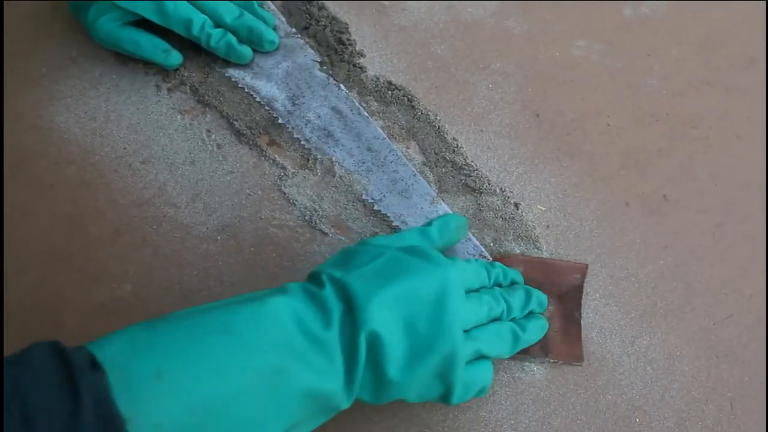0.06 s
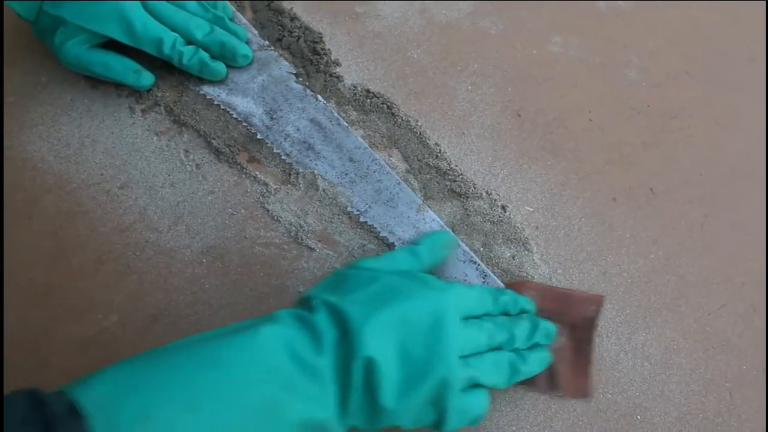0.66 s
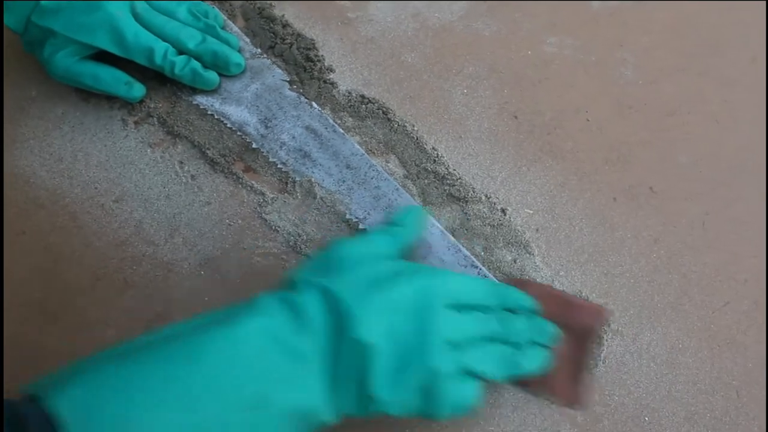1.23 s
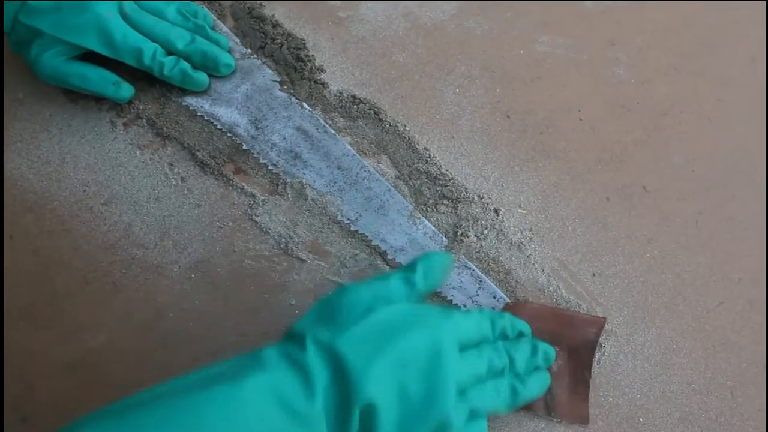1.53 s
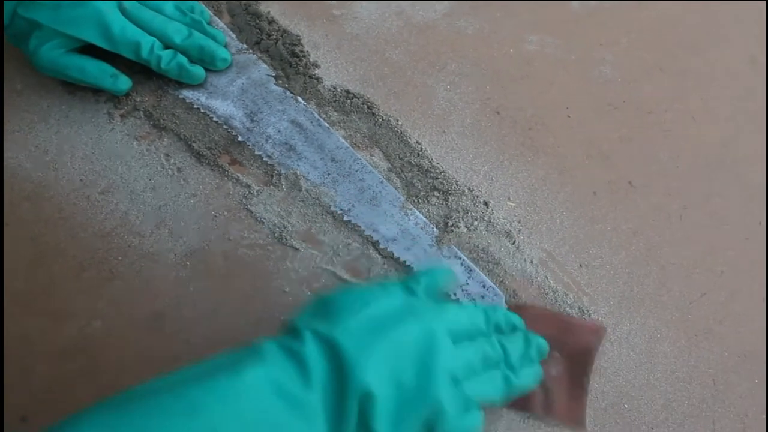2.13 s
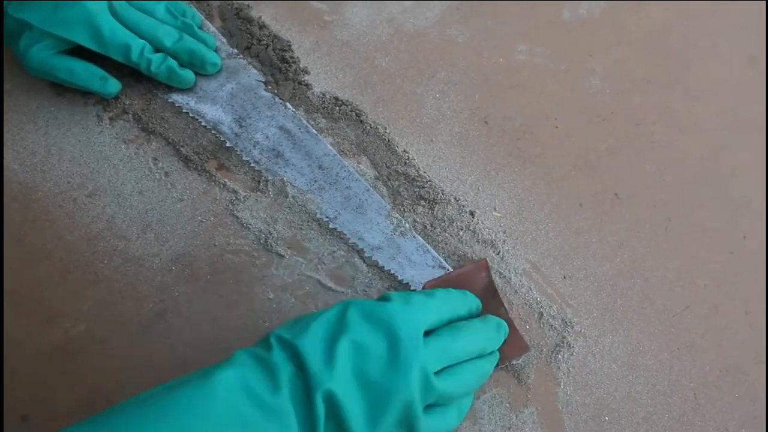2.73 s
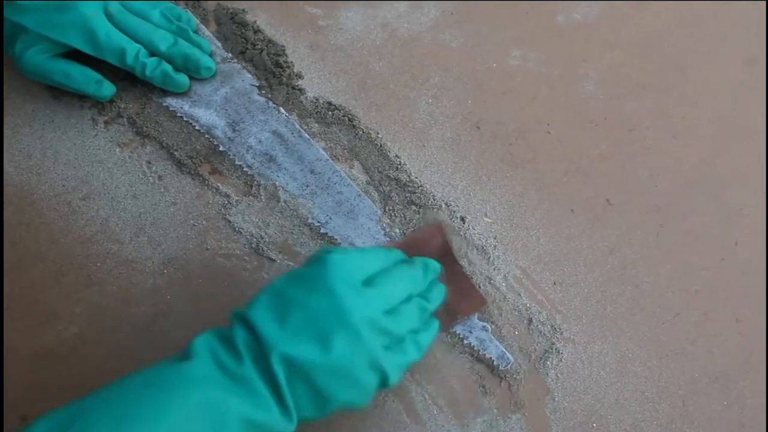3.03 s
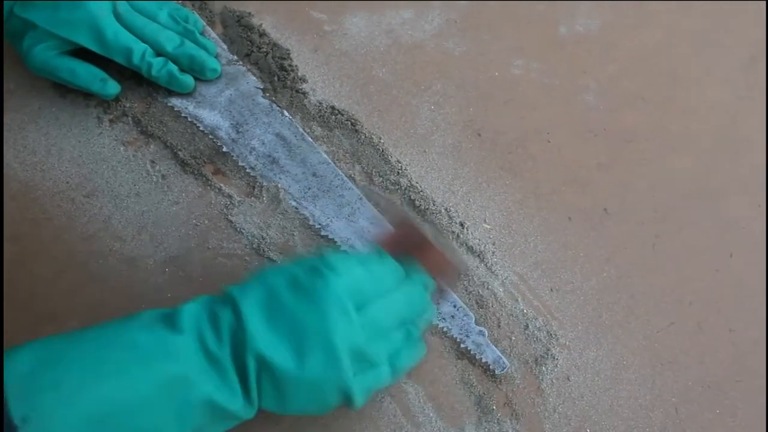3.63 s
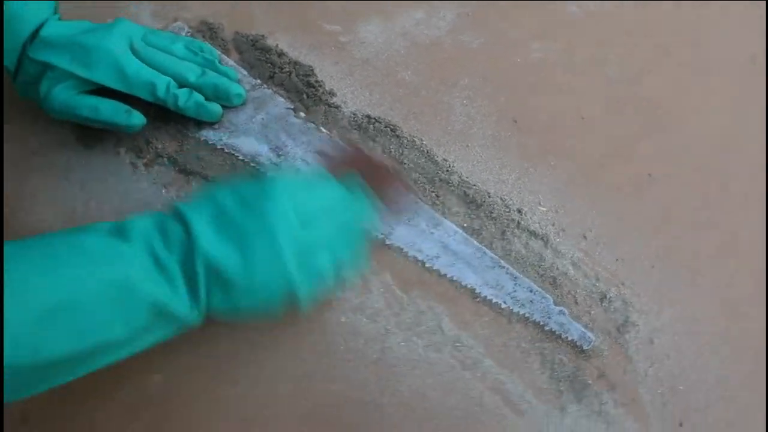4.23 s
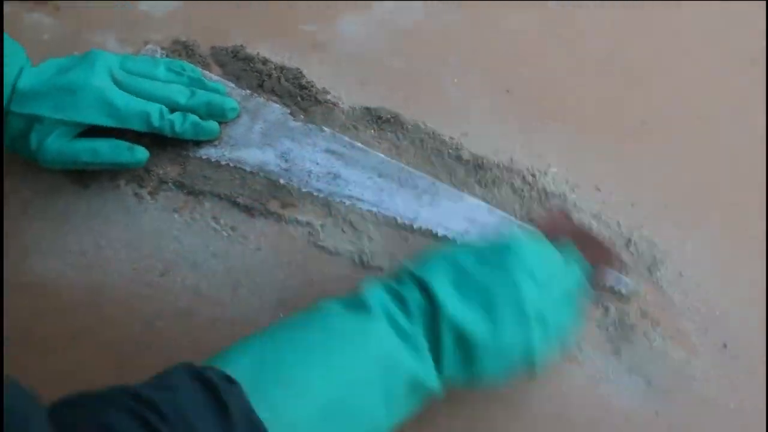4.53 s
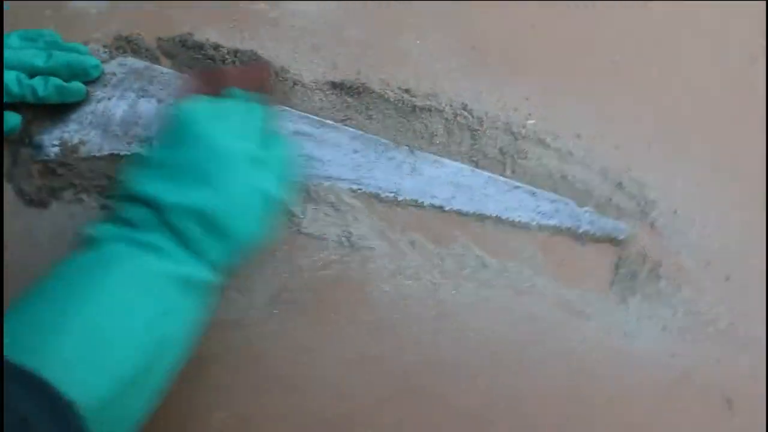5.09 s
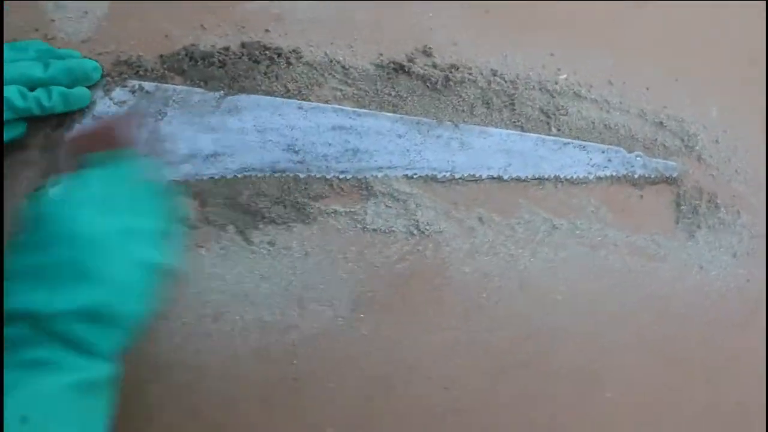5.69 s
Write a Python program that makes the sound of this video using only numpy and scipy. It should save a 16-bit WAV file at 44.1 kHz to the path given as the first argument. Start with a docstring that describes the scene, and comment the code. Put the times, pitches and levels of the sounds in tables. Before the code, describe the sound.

Quick, gritty strokes of sandpaper and sand rasp on a rusty saw blade, almost stopping midway, then scrubbing harder.

```python
"""A gloved hand scrubs sandpaper and sand over a rusty saw blade on a concrete floor; the strokes follow each
other very fast. It starts softly with a flat hand, grows louder on the blade's tip and almost stops just before
3 s. It goes on with the fingertips, hard at mid blade, lighter on the pad's edge, then hard on the heel. All
along, crushed grit rasps, the blade hums dully, the glove rumbles and sometimes bumps, and the workshop gives a
short echo."""
import sys
import numpy as np
from scipy import signal
from scipy.fft import rfft, irfft
from scipy.io import wavfile
from scipy.ndimage import uniform_filter1d, map_coordinates

SR = 44100
rng = np.random.default_rng(int(sys.argv[2]) if len(sys.argv) > 2 else 0)


def pcm_store(signal):
    """Save signal as 16-bit PCM."""
    levels = np.round(np.clip(np.atleast_2d(signal), -1, 1) * 32767)
    wavfile.write(sys.argv[1], SR, levels.astype(np.int16).T)


N = 262395
TIME = np.arange(N) / SR

# Tone of the rasp for each way of holding the pad: pitch_hz, level_db
FLAT_HAND = [(600, -2), (1000, -5), (1150, -5.5), (1800, -5.5), (2400, -0.2), (3000, 1), (3800, -4),
             (5400, -2), (8700, -12), (10000, -13), (11000, -16), (14000, -20), (15500, -27)]
ON_TIP = [(600, -11.5), (1000, -10.5), (1150, -7), (2350, -9.5), (2850, 1), (3500, -2.5), (4300, -7),
          (6200, -7.5), (8000, -7.5), (10600, -4.5), (14200, -11.5), (15500, -19)]
FINGERTIPS = [(600, -12.5), (1000, -11), (1250, -4.5), (1600, -1), (2150, -11), (2600, -5.5), (3100, -0.5),
              (4300, -2.5), (5800, -3.5), (7200, -7.5), (9500, 2.5), (14000, -3), (15500, -12)]
MID_BLADE = [(600, -6.5), (1000, -6.5), (1350, -3), (1900, -9), (2700, -2), (3900, 1.5), (4700, -0.7),
             (7500, -3), (9700, -4), (11500, -8.5), (14200, -12), (15500, -22)]
PAD_EDGE = [(600, -7), (1100, -4.5), (1600, 1.5), (2350, -7), (3100, -1.5), (3700, -2.5), (4400, -6),
            (6000, -4), (7200, -7), (10500, -3), (13500, -11), (15500, -16)]
ON_HEEL = [(600, -12.5), (1000, -13.5), (1650, -8.5), (2400, -14), (3200, -4.5), (3800, -3), (4400, -5.5),
           (7000, -6.5), (9200, -6), (11500, -9.5), (14300, -13), (15500, -25)]
# Each hold, with base levels against the rasp: start_s, end_s, tone, rumble_db, hum_db, fizz_db
HOLDS = [(0, 1.22, FLAT_HAND, -16.5, -16, -5.8), (1.504, 2.833, ON_TIP, -21.5, -12.5, -7.5),
         (3.02, 3.45, FINGERTIPS, -26, -17, -10), (3.8, 4.2, MID_BLADE, -22, -13.5, -6.5),
         (4.4, 4.51, MID_BLADE, -25.5, -30, -6), (4.614, 4.834, PAD_EDGE, -20.5, -14.5, -7),
         (5.003, 6.0, ON_HEEL, -25.5, -25, -6)]


def amp(db):
    """Turns decibels into a gain."""
    return 10 ** (np.asarray(db) / 20)


def unit(x):
    """Scales a signal to an average power of 1."""
    return x / np.sqrt(np.mean(x ** 2) + 1e-20)


def add(mix, start_s, sound):
    """Mixes a sound in at the given time."""
    part = mix[max(round(start_s * SR), 0):][:len(sound)]
    part += sound[:len(part)]


def colour(x, tone, low_hz=10):
    """Filters by (pitch_hz, level_db) points, cutting steeply below low_hz."""
    hz = np.fft.rfftfreq(len(x), 1 / SR) + 1
    pitch_hz, level_db = np.transpose(tone)
    gain = amp(np.interp(np.log(hz), np.log(pitch_hz), level_db)) / np.sqrt(1 + (low_hz / hz) ** 10)
    return irfft(rfft(x) * gain, len(x))


def wander(rate_hz):
    """A smooth random wobble, up to about the given rate."""
    hz = np.fft.rfftfreq(N, 1 / SR)
    return unit(irfft(rfft(rng.standard_normal(N)) * np.exp(-(hz / rate_hz) ** 2), N))


def grit(per_s, spread_db, bed):
    """Grains of uneven size snap over a hissing bed of countless fine ones."""
    size = amp(spread_db * np.minimum(rng.exponential(1, N), 4)) * rng.choice([-1, 1], N)
    snaps = unit(size * (rng.random(N) < per_s / SR))
    return unit(snaps + bed * rng.standard_normal(N))


def held(values):
    """Takes one value per hold and glides between them as the hand shifts."""
    return np.interp(TIME, np.ravel([hold[:2] for hold in HOLDS]), np.repeat(values, 2))


def still_air(level_db=-54.5):
    """The air of the workshop makes a faint, steady hush."""
    # Tone of the hush: pitch_hz, level_db
    air_tone = [(20, -14), (60, -10.5), (200, -5), (700, -3), (3000, -6), (7000, -15), (15000, -19)]
    return amp(level_db) * unit(colour(rng.standard_normal(N), air_tone))


def workshop_echo(sound, fade_s=0.18, level_db=-20, delay_s=0.0083):
    """The room answers with a short, slightly dull tail that falls 60 dB in fade_s."""
    t = TIME[:SR // 2]
    tail = colour(rng.standard_normal(len(t)), [(200, 9.0), (2000, 2.0), (14000, -2.5)])
    tail *= amp(-60 * t / fade_s) * (t > delay_s)
    return amp(level_db) * signal.oaconvolve(sound, tail / np.linalg.norm(tail))[:N]


def hand_bumps(swell_s=0.0065, gain_db=-6):
    """The hand knocks the blade: a soft, low thud with no ring."""
    # Knocks, before gain_db: start_s, level_db
    knocks = [(0.585, -47), (0.725, -39), (1.065, -35), (1.225, -36), (2.537, -43), (2.612, -42),
              (3.803, -38), (3.881, -40), (4.237, -39), (4.311, -42), (4.913, -39), (5.435, -33.5)]
    thud_tone = [(40, -25), (110, -6.5), (290, -4.0), (600, -17), (2000, -51)]  # pitch_hz, level_db
    out, t = np.zeros(N), TIME[:SR // 12]
    for start_s, level_db in knocks:
        thud = colour(rng.standard_normal(len(t)), thud_tone) * t * np.exp(-t / swell_s)
        add(out, start_s, amp(level_db + gain_db) * thud / abs(thud).max())
    return out


def grain_cracks(decay_s=0.0052):
    """Single coarse grains burst with a bright tick."""
    # Bursting grains: start_s, peak_db
    bursts = [(0.06, -26), (1.213, -35), (2.926, -28)]
    out, t = np.zeros(N), TIME[:SR // 50]
    for start_s, peak_db in bursts:
        tick = colour(rng.standard_normal(len(t)), ON_HEEL, low_hz=1500) * np.exp(-t / decay_s)
        add(out, start_s, amp(peak_db) * tick / abs(tick).max())
    return out


def glove_rumble(force, lumpy_db=1.2, gain_db=-1):
    """Rubber and paper judder over the sand, rumbling under each stroke."""
    # Tone of rubber dragging over the floor: pitch_hz, level_db
    rubber_tone = [(25, -29), (60, -18), (110, -9.5), (140, -9), (170, -5), (250, 1), (320, 4), (385, -1),
                   (470, -0.5), (620, -9.5), (900, -38)]
    drag = colour(grit(per_s=770, spread_db=2.5, bed=0.86), rubber_tone)
    judder = unit(drag * amp(lumpy_db * wander(rate_hz=30)))
    return amp(gain_db) * force * judder


def blade_hum(force):
    """Grit sets the blade ringing; the sand it lies on soon stops each note."""
    # The blade's own notes (wider ones die sooner): pitch_hz, width_hz, level_db
    notes = [(542, 29, -12.5), (659, 32, -6), (720.6, 38, 1), (776, 55, -2.5), (827, 62, -1), (937, 73, -8)]
    t = TIME[:SR // 10]
    ring = np.zeros(len(t))
    for k, (pitch_hz, width_hz, level_db) in enumerate(notes):
        fade = amp(level_db) * width_hz * np.exp(-np.pi * width_hz * t)
        ring += (-1) ** k * fade * np.cos(2 * np.pi * pitch_hz * t)
    dull_ring = colour(ring, [(1000, 4), (1600, -19), (5000, -42)], low_hz=394)[:SR // 20]
    taps = force * grit(per_s=2500, spread_db=2.0, bed=0.74)
    return signal.oaconvolve(taps, dull_ring / np.linalg.norm(dull_ring))[:N]


def hand_strokes(jitter_s=0.0007, uneven_db=0.5):
    """The hand scrubs to and fro. Gives one row per stroke: time_s, level_db, length_factor."""
    # Runs of evenly paced strokes, alternating by swing_db:
    # first_s, last_s, count, first_db, last_db, swing_db, length_factor
    runs = [(0.015, 0.262, 7, -40, -41.5, -0.2, 0.84), (0.3, 0.765, 12, -40, -39, 0.5, 0.93),
            (0.807, 1.229, 11, -39.5, -36, -0.3, 0.9), (1.277, 1.435, 5, -35.5, -35, 1.3, 0.99),
            (1.473, 1.643, 6, -28.5, -28.5, -1, 0.74), (1.678, 2.238, 18, -29.2, -26.5, 0, 0.75),
            (2.275, 2.355, 3, -33, -38.5, 0, 0.85), (2.429, 2.552, 4, -39.5, -32.5, 1, 1.03),
            (2.588, 2.749, 6, -35, -37.5, 1.5, 0.81), (2.808, 2.883, 3, -48, -56.5, 2, 2.1),
            (2.954, 2.996, 2, -38.5, -32, -2, 1.17), (3.03, 3.413, 12, -31, -30, 0, 0.95),
            (3.443, 3.779, 10, -30.2, -29, -0.5, 1.016), (3.813, 4.135, 10, -25.3, -23, 0.5, 0.91),
            (4.166, 4.515, 10, -23.5, -25, 0.04, 0.94), (4.552, 4.734, 6, -31.5, -33.5, -2, 1.01),
            (4.766, 4.963, 6, -31, -29, 2, 0.96), (4.998, 5.463, 13, -23.5, -23, 0, 1.04),
            (5.502, 5.702, 6, -23, -24, -0.5, 1.04), (5.741, 5.962, 7, -24, -26, -0.5, 0.96)]
    # Single strokes that dig in harder: time_s, extra_db
    accents = [(0.182, 3), (0.6, 4), (0.847, 3.5), (1.018, 2.5), (1.939, 4), (2.623, 5.5), (4.807, 5.2)]
    rows = []
    for first_s, last_s, count, first_db, last_db, swing_db, length in runs:
        for k, (time_s, db) in enumerate(np.linspace((first_s, first_db), (last_s, last_db), count)):
            late, harder = rng.standard_normal(2)
            level_db = db + swing_db * (-1) ** k + uneven_db * harder
            rows.append((time_s + jitter_s * late, level_db, length))
    strokes = np.array(rows)
    for time_s, extra_db in accents:
        nearest = np.argmin(abs(strokes[:, 0] - time_s))
        strokes[nearest, 1] += extra_db
    return strokes


def rubbing_force(strokes, rise_s=0.011, fall_s=0.018, lead_s=0.00094, gain_db=1.7):
    """Each stroke bites quickly and eases off, no two at quite the same pace."""
    power = np.zeros(N)
    for time_s, level_db, length in strokes:
        bite, ease = amp(1.2 * rng.standard_normal(2))  # random stretch of rise and fall
        near = abs(TIME - time_s) < 0.07
        from_peak = (TIME[near] - time_s + lead_s) / length
        rising = (from_peak / (rise_s * bite)) ** 2
        falling = abs(from_peak / (fall_s * ease)) ** 1.43
        swell = np.exp(-np.where(from_peak < 0, rising, falling))
        power[near] += (amp(level_db + gain_db) * swell) ** 2
    return np.sqrt(power)


def with_hand_echo(sound):
    """Sound bounces off the hand; the tiny delay shifts as it tilts, changing the tone."""
    # The bounce: time_s, delay_s, strength (0 to 1)
    bounces = [(0, 0.00058, 0.03), (.6, 0.00043, 0), (1.3, 0.00045, 0), (1.6, 0.00048, 0.24),
               (2.251, 0.000508, 0.11), (2.9, 0.00048, 0), (5.9, 0.00029, 0.07)]
    time_s, *columns = np.transpose(bounces)
    delay_s, strength = (np.interp(TIME, time_s, column) for column in columns)
    echo = map_coordinates(sound, [(TIME - delay_s) * SR], order=3)
    return (sound + strength * echo) / np.sqrt(1 + strength ** 2)


def sandpaper_rasp(force, fizz_db, low_hz=560, split_hz=7800):
    """The pad crushes a swarm of grit into coarse scratch and fine fizz; the hold sets the tone."""
    grains = grit(per_s=7000, spread_db=1.5, bed=0.85)
    rasp = np.zeros(N)
    for (_, _, tone, *_), in_use in zip(HOLDS, np.eye(len(HOLDS))):
        rasp += np.sqrt(held(in_use)) * unit(colour(grains, tone, low_hz))
    # The more fine sand under the pad, the larger the treble's share of the power.
    fizz = signal.sosfiltfilt(signal.butter(6, split_hz, "high", fs=SR, output="sos"), rasp)
    scratch = rasp - fizz
    share = uniform_filter1d(fizz ** 2, size=8000) / uniform_filter1d(rasp ** 2, size=8000)
    wanted = np.clip(amp(fizz_db) ** 2, 0.01, 0.9)
    balanced = fizz * np.sqrt(wanted / share) + scratch * np.sqrt((1 - wanted) / (1 - share))
    return force * unit(with_hand_echo(balanced))


def scene(firm_stroke_db=-30.5, catch_db=1.0):
    """One rubbing force, catching and slipping, drives the rasp, the blade and the glove."""
    strokes = hand_strokes()
    force = rubbing_force(strokes) * unit(amp(catch_db * wander(rate_hz=260)))
    effort_db = np.interp(TIME, strokes[:, 0], strokes[:, 1]) - firm_stroke_db
    rumble_db, hum_db, fizz_db = map(held, np.transpose([hold[3:] for hold in HOLDS]))
    # Pressing harder adds fizz faster than rasp, and rumble and hum more slowly.
    rasp = sandpaper_rasp(force, fizz_db + 0.16 * effort_db)
    hum = blade_hum(force * amp(hum_db - 0.42 * effort_db))
    rumble = glove_rumble(force * amp(rumble_db - 0.65 * effort_db))
    work = rasp + hum + rumble + hand_bumps() + grain_cracks()
    return (still_air() + work + workshop_echo(work))[None]


def record(dry, dip_hz=11265, dip_width_hz=140, dip_depth=0.47, top_hz=15650):
    """Makes a narrow dip in the treble and cuts everything above top_hz."""
    notched = signal.lfilter(*signal.iirnotch(dip_hz, dip_hz / dip_width_hz, SR), dry)
    dipped = dry + dip_depth * (notched - dry)
    low_pass = signal.firwin(301, top_hz, window=("kaiser", 9), fs=SR)
    return signal.oaconvolve(dipped, low_pass[None], "same")


dry = scene()
out = record(dry)
pcm_store(out)
```